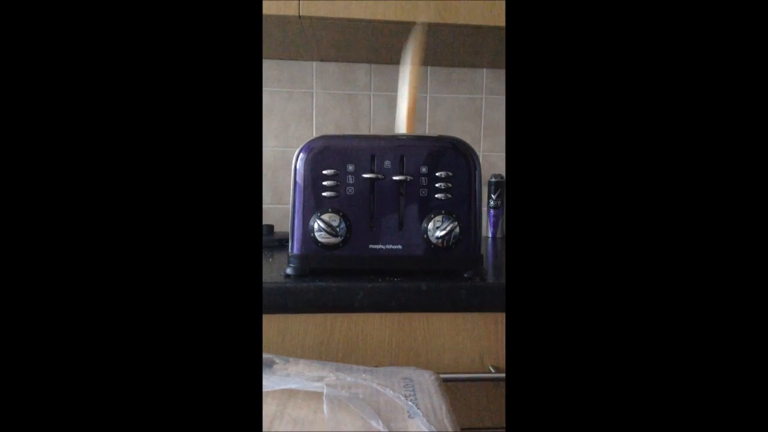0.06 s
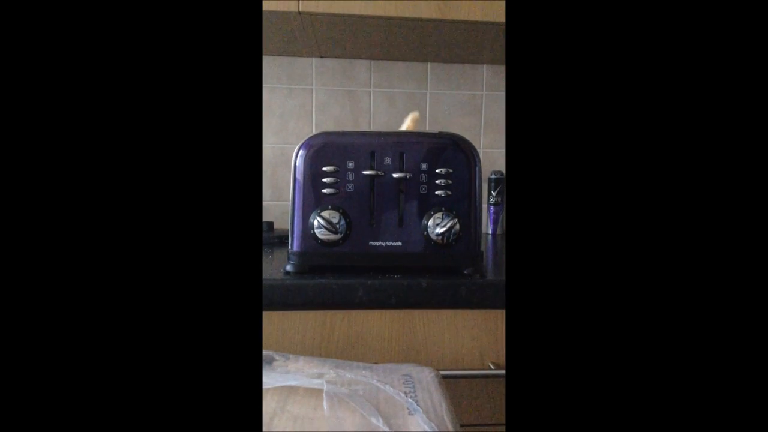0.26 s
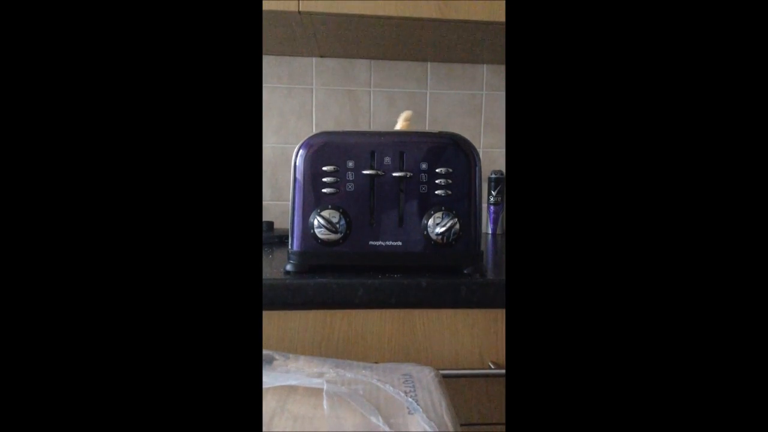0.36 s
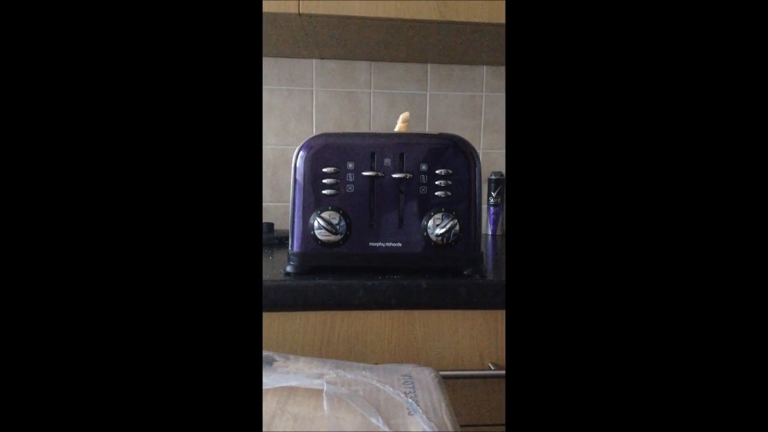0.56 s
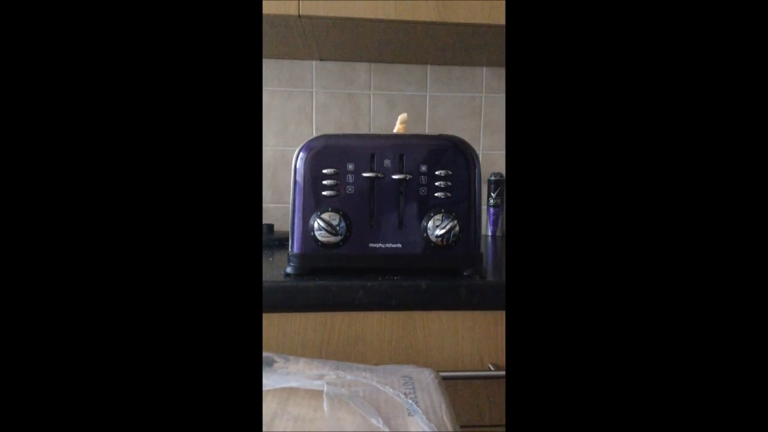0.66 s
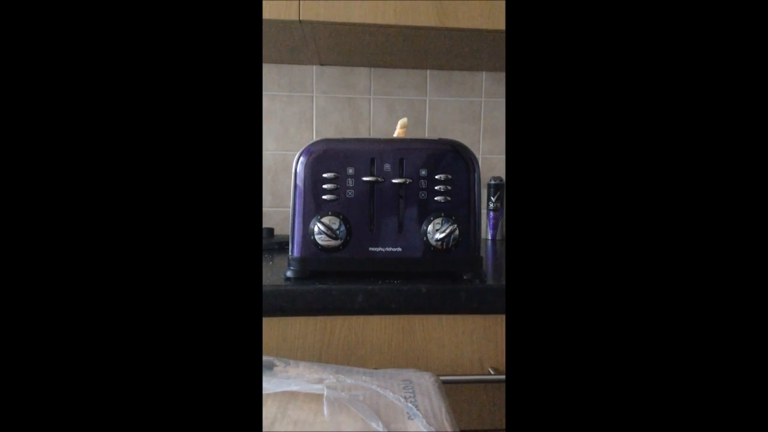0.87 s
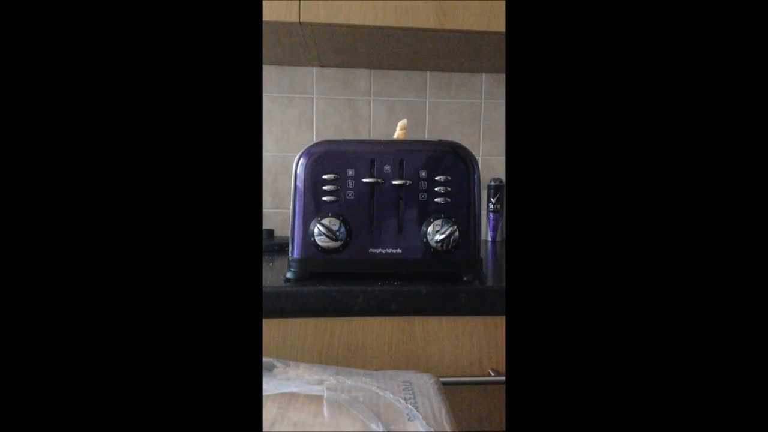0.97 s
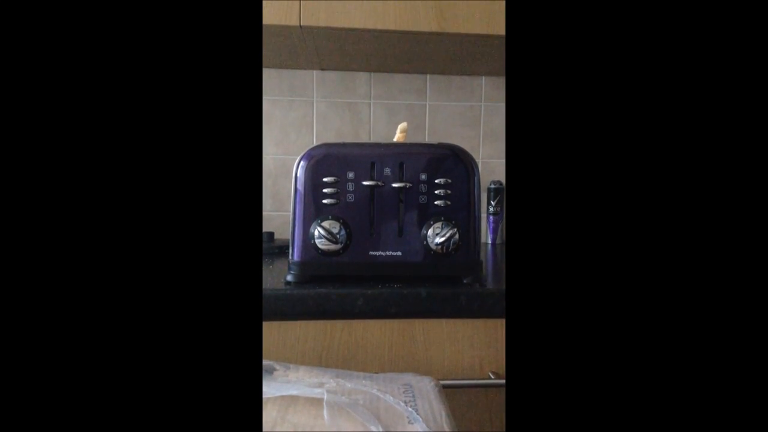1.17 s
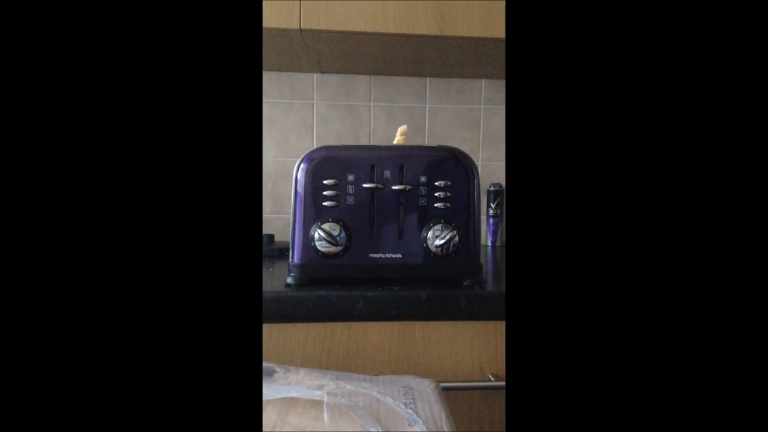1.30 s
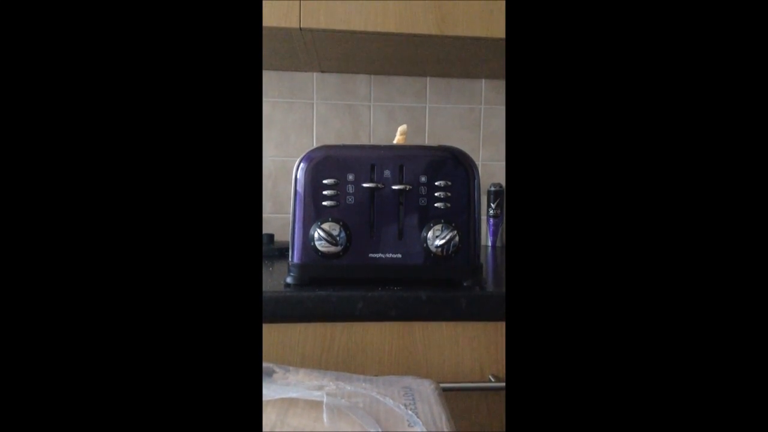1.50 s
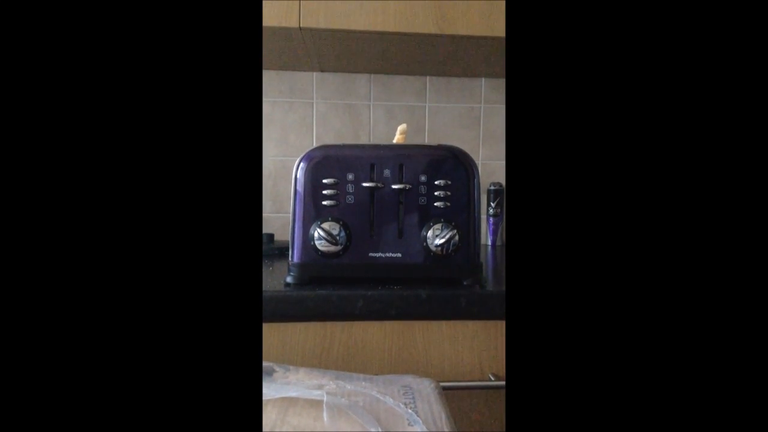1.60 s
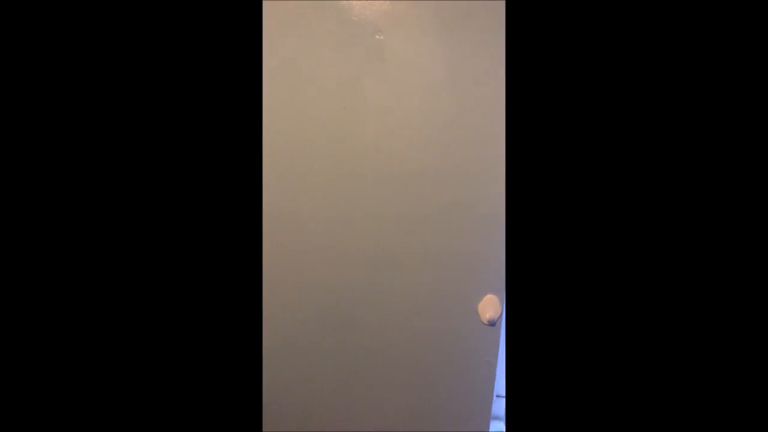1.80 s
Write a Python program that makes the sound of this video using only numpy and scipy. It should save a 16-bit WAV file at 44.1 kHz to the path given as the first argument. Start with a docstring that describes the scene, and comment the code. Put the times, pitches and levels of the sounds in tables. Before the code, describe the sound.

An object drops into a metal toaster with one sharp, bright crash and brief ringing.

```python
"""Drop into a metal toaster

Something lands in a toaster on a kitchen counter: one bright crash of a few quick contacts. The sheet-metal
case rings briefly in the tiled room; springs and wires inside quiver on for a second. The object settles with
dull knocks, and a thin sizzle swells and fades. Underneath sits a quiet bed of hum and hiss; near the end the
whole sound drops out for a moment."""
import sys
import numpy as np
from scipy import signal
from scipy.fft import rfft, irfft
from scipy.io import wavfile

SR = 44100
rng = np.random.default_rng(int(sys.argv[2]) if len(sys.argv) > 2 else 0)


def int16_out(signal):
    """Quantize to a 16-bit WAV file."""
    q = np.round(np.clip(np.atleast_2d(signal).T, -1, 1) * 32767)
    wavfile.write(sys.argv[1], SR, q.astype(np.int16))


N = 81585
TIME = np.arange(N) / SR

# The quick hits of the landing: start_s, level_db, tilt_db_per_octave
LANDING_HITS = [(0.1956, -38, -4), (0.2000, -27.5, -1.5), (0.207, -24.5, 0.5), (0.2106, -25.5, 0),
                (0.2242, -24.5, -1.5), (0.2325, -27, 10.5)]
# Tone colour of the dense ring of case and room: freq_hz, relative_db
CRASH_COLOUR = [(50, -39.5), (85, -19), (120, -12), (190, -4), (300, -4), (490, -10.5), (900, -6),
                (1600, -5), (2300, -7), (3000, -5), (4000, -4), (6800, -5.5), (11000, -5.5), (15000, -7)]
# Tail length of that ring: freq_hz, t60_s
CRASH_TAIL = [(100, 0.46), (350, 0.57), (700, 0.6), (1500, 0.48), (3000, 0.47), (5500, 0.42), (9000, 0.35),
              (15000, 0.27)]
# Partials of the sheet-metal case: pitch_hz, level_db, t60_s
CASE_PARTIALS = [(190, -27, .42), (291, -32, .3), (409, -35.5, .4), (528, -38.5, .5), (608, -29, .36),
                 (829, -25, .23), (848, -26, .17), (1031, -33, .3), (1137, -32.5, .36), (1221.5, -29.5, .4),
                 (1247, -25, .13), (1339, -23, .15), (1583, -28, .2), (1811, -21, .16), (1833, -28.5, .3),
                 (3332, -31.5, .25), (3585, -33, .36), (3845, -37.5, .38), (4059.5, -20, .21),
                 (4527.5, -33, .36), (9778, -36, .28), (11536, -29, .28), (13552, -30.5, .2)]
# Long-ringing springs and wires inside: pitch_hz, level_db, t60_s, quiver_depth
SPRING_PARTIALS = [(374, -37, .95, .25), (381.5, -49.5, 4.5, .18), (766, -43.5, 1.0, .4),
                   (1070, -61, 2.6, .2), (3113, -41.5, .95, .05)]
# Small knocks as the object settles: start_s, level_db
KNOCKS = [(0.414, -50.5), (0.465, -47.5), (0.562, -50.5)]
# Tone colour of the knocks: freq_hz, relative_db
KNOCK_COLOUR = [(80, -19), (120, -16), (190, -2), (290, -8.5), (410, 2.5), (600, -16), (790, -4.5),
                (1000, -16), (2500, -36), (12000, -32)]
# Narrow bands of the sizzle at the top of its swell: centre_hz, width_hz, level_db
SIZZLE_BANDS = [(6210, 190, -74), (12600, 620, -75)]
# Tone colour of the room hum: freq_hz, relative_db
HUM_COLOUR = [(40, -37), (80, -37), (125, -20.5), (175, -7.5), (230, 0.5), (275, -4.5), (320, -10.5),
              (420, -4.5), (560, -18), (1100, -18.5), (2000, -33.5), (8000, -28.5)]
# Fader curve of the hum: time_s, level_db
HUM_FADER = [(0, -76.5), (.15, -69), (.6, -66), (1.4, -71), (1.85, -67)]
# Tone colour of the hiss: freq_hz, relative_db
HISS_COLOUR = [(40, -12), (150, 10.5), (700, 3), (2200, 0), (7000, -0.5), (15000, -2)]
# Fader curve of the hiss: time_s, level_db
HISS_FADER = [(0, -66), (.3, -63.5), (.65, -61.5), (.95, -63.5), (1.25, -65.5), (1.85, -65.5)]


def crash(crack_db=1.5, crack_t60_s=0.02):
    """Each hit cracks, crack_db above its tail, then rings through case and room; the top dies first."""
    out = 0
    for start_s, level_db, tilt in LANDING_HITS:
        crack = from_db(crack_db) * decay(start_s, crack_t60_s)
        ring = dense_ring(CRASH_COLOUR, lambda hz: crack + decay(start_s, at_hz(CRASH_TAIL, hz)), tilt)
        out += from_db(level_db) * ring
    return out


def case_clang():
    """The struck sheet metal gives a short, inharmonic clang."""
    return sum(partial(*row) for row in CASE_PARTIALS)


def case_glint(count=70, total_db=-27.5, spread_db=4.5):
    """Weak case partials scattered over the treble put a metallic glint on the crash."""
    pitches_hz = rng.uniform(2600, 15000, count)
    levels_db = at_hz(CRASH_COLOUR, pitches_hz) + rng.normal(0, spread_db, count)
    power = np.sum(from_db(levels_db) ** 2) / 2
    levels_db += total_db - 10 * np.log10(power)
    return sum(partial(hz, db, at_hz(CRASH_TAIL, hz)) for hz, db in zip(pitches_hz, levels_db))


def springs(quiver_hz=10.63):
    """Springs and wires ring on, throbbing unevenly as they quiver."""
    quiver = narrow_noise(quiver_hz, width_hz=8.2)
    return sum(partial(hz, db, t60_s) * (1 + depth * quiver) for hz, db, t60_s, depth in SPRING_PARTIALS)


def settling_knocks(t60_s=0.4):
    """Dull little knocks as the object comes to rest."""
    power = sum((from_db(db) * decay(start_s, t60_s)) ** 2 for start_s, db in KNOCKS)
    return dense_ring(KNOCK_COLOUR, lambda hz: np.sqrt(power))


def sizzle(peak_s=0.87, spread_s=0.19):
    """A thin high buzz, like a loose wire, swells and fades."""
    swell = np.exp(-0.5 * ((TIME - peak_s) / spread_s) ** 2)
    return swell * sum(from_db(db) * narrow_noise(hz, width_hz) for hz, width_hz, db in SIZZLE_BANDS)


def room_tone():
    """A bed of low hum and soft hiss, each drifting in level."""
    return fader(HUM_FADER) * noise(HUM_COLOUR) + fader(HISS_FADER) * noise(HISS_COLOUR)


def dense_ring(colour, envelope, tilt_db_per_octave=0):
    """Countless overlapping modes: third-octave noise bands, each shaped by envelope(hz)."""
    edges = np.geomspace(45, 16500, 26)
    centres = np.sqrt(edges[1:] * edges[:-1])
    gains = from_db(at_hz(colour, centres) + tilt_db_per_octave * np.log2(centres))
    gains /= np.sqrt(np.sum(gains ** 2 * np.diff(edges)) * 2 / SR)  # unit total power
    white = rng.standard_normal((2, N))  # neighbouring bands get independent noise
    out = 0
    for k, hz in enumerate(centres):
        band = signal.butter(2, edges[k:k + 2], "band", fs=SR, output="sos")
        out += gains[k] * signal.sosfilt(band, white[k % 2] * envelope(hz) + 1e-18)
    return out


def partial(hz, db, t60_s, attack_s=0.0084):
    """One metal mode: a sine that builds from the second hit and rings out."""
    start_s = LANDING_HITS[1][0]
    attack = 1 - np.exp(-np.maximum(TIME - start_s, 0) / attack_s)
    tone = np.sin(2 * np.pi * (hz * TIME + rng.random()))
    return from_db(db) * attack * decay(start_s, t60_s) * tone


def narrow_noise(hz, width_hz):
    """Noise twice through one resonance, rms 1."""
    b, a = signal.iirpeak(hz, hz / width_hz, fs=SR)
    once = signal.lfilter(b, a, rng.standard_normal(N + SR))
    return rms_one(signal.lfilter(b, a, once)[SR:])  # skip the resonance's build-up


def noise(colour):
    """Steady noise of a given colour, rms 1."""
    hz = np.maximum(np.fft.rfftfreq(N, 1 / SR), 1)
    spectrum = rfft(rng.standard_normal(N)) * from_db(at_hz(colour, hz))
    return rms_one(irfft(spectrum, N))


def decay(start_s, t60_s):
    """Envelope that jumps to one and falls 60 dB every t60_s."""
    return (TIME >= start_s) * from_db(-60 * np.maximum(TIME - start_s, 0) / t60_s)


def fader(points):
    """Gain over time from rows of time_s, level_db."""
    return from_db(np.interp(TIME, *np.transpose(points)))


def at_hz(points, hz):
    """Read a table on a log-frequency axis."""
    freqs_hz, values = np.transpose(points)
    return np.interp(np.log(hz), np.log(freqs_hz), values)


def from_db(db):
    """Decibels to gain."""
    return 10 ** (np.asarray(db) / 20)


def rms_one(x):
    """Scale to unit rms."""
    return x / np.sqrt(np.mean(x ** 2) + 1e-20)


def scene():
    """Mono mix of the landing and its aftermath over the kitchen's room tone."""
    landing = crash() + case_clang() + case_glint() + springs()
    return (landing + settling_knocks() + sizzle() + room_tone())[None]


def record(dry, low_cut_hz=161, high_cut_hz=15300, dropout_s=(1.741, 1.779), dropout_db=-27.5):
    """Thin the deep bass, duck the whole mix for a moment near the end and cut the very top."""
    low_cut = signal.butter(2, low_cut_hz, "high", fs=SR, output="sos")
    high_cut = signal.ellip(12, 0.2, 70, high_cut_hz, fs=SR, output="sos")
    in_dropout = (TIME > dropout_s[0]) & (TIME < dropout_s[1])
    ducked = signal.sosfilt(low_cut, dry) * from_db(dropout_db * in_dropout)
    return signal.sosfilt(high_cut, ducked)


dry = scene()
out = record(dry)
int16_out(out)
```